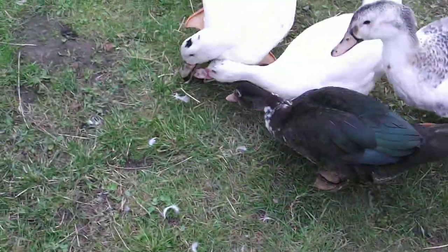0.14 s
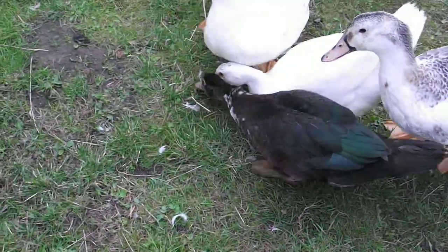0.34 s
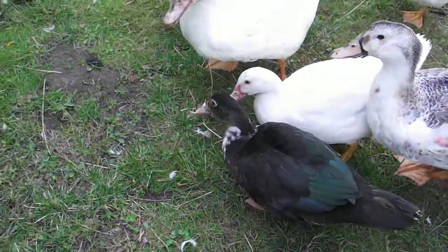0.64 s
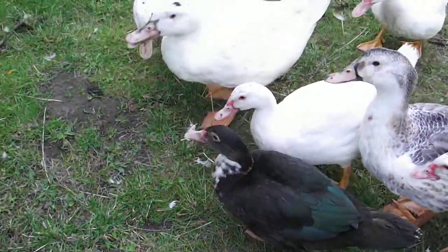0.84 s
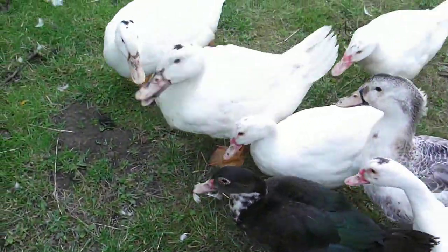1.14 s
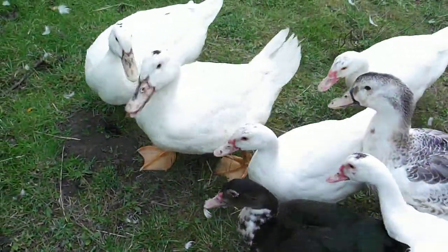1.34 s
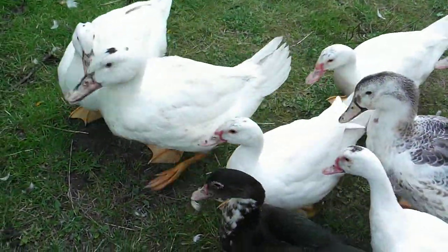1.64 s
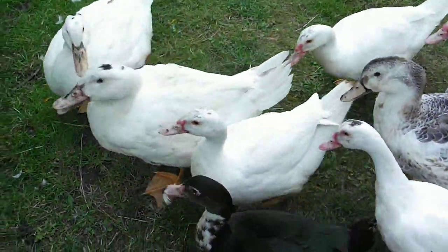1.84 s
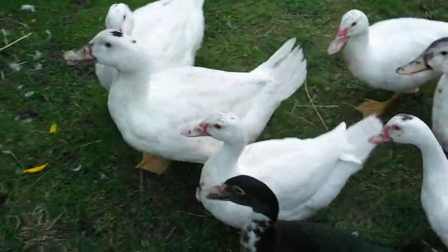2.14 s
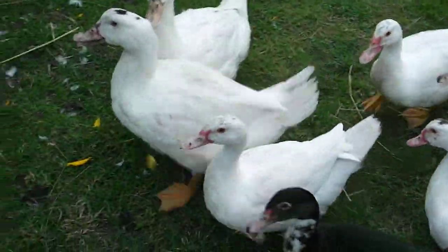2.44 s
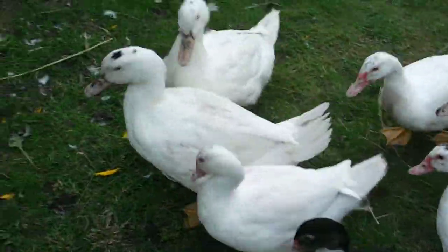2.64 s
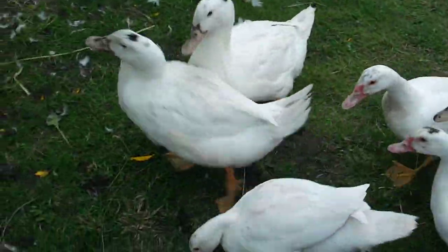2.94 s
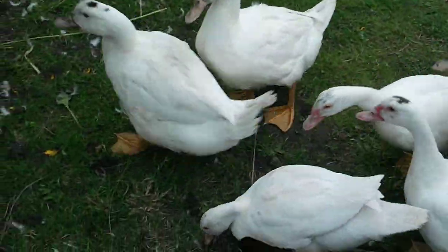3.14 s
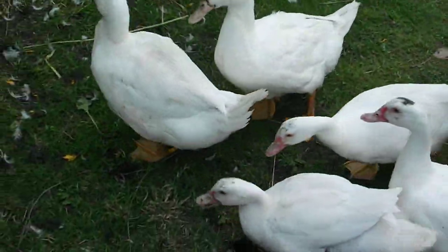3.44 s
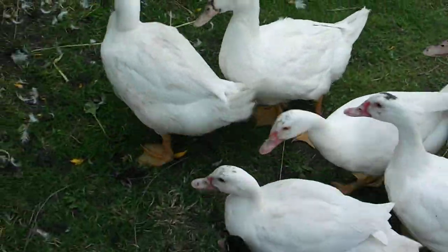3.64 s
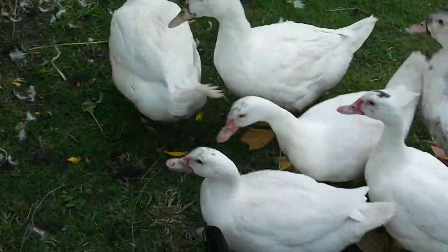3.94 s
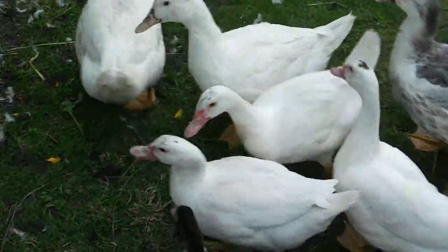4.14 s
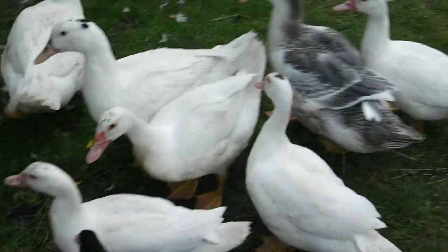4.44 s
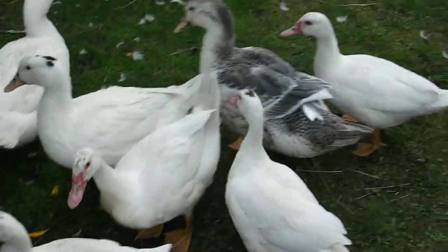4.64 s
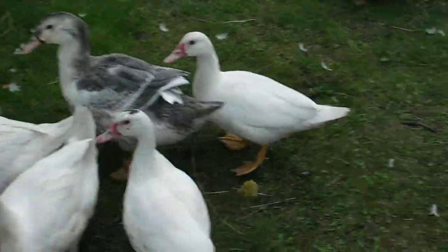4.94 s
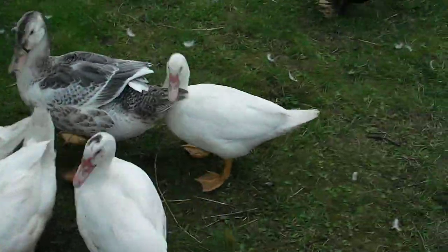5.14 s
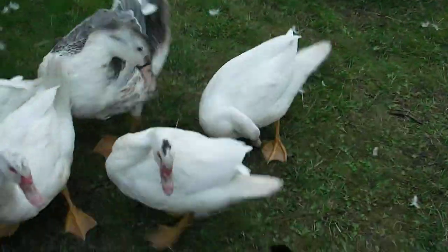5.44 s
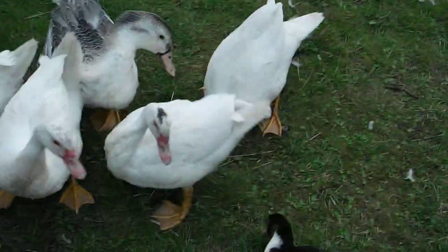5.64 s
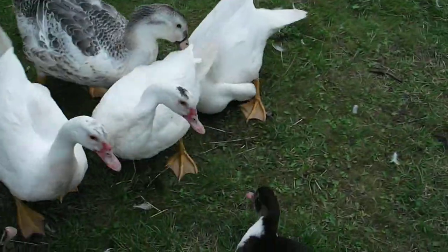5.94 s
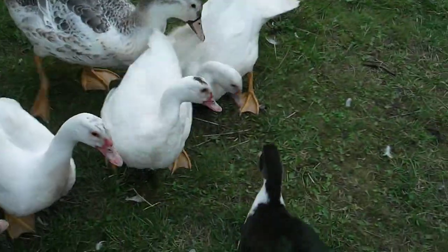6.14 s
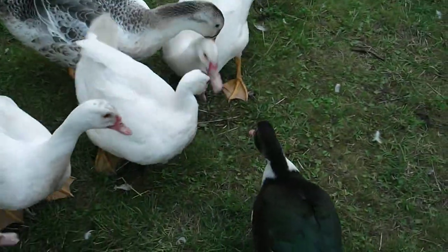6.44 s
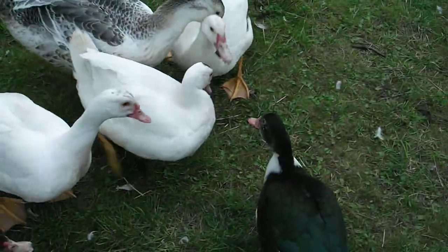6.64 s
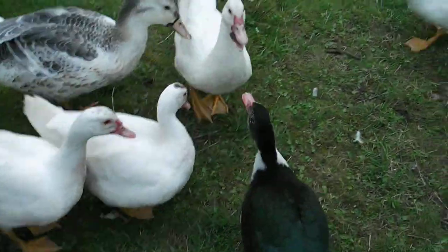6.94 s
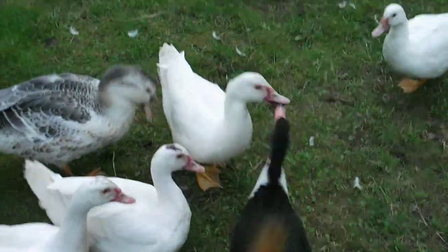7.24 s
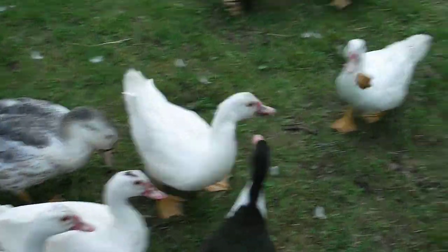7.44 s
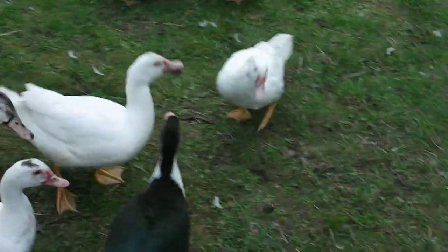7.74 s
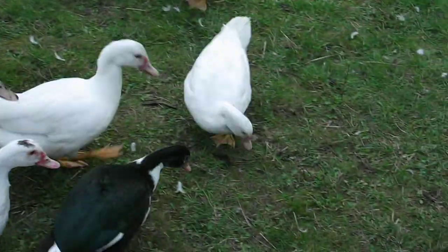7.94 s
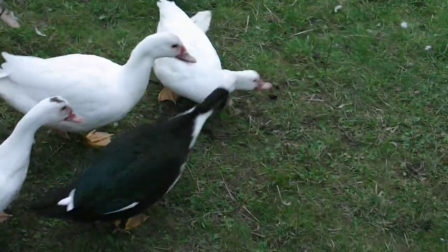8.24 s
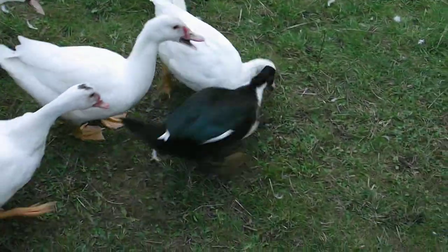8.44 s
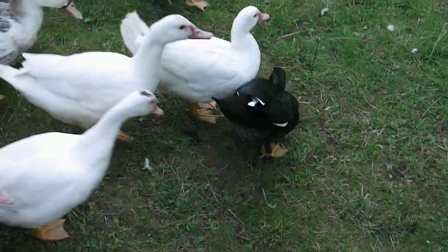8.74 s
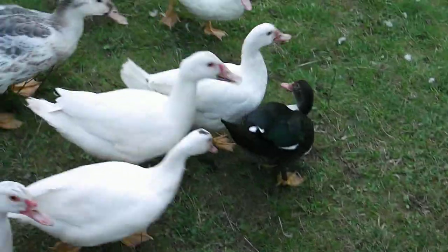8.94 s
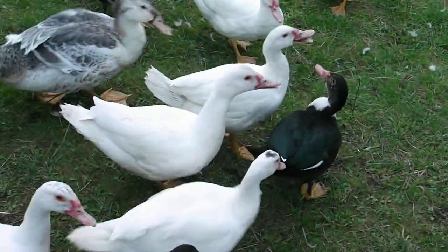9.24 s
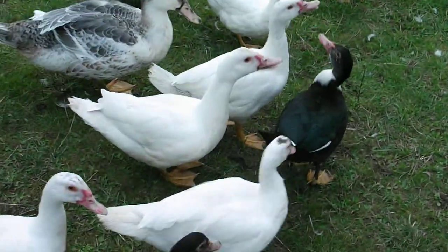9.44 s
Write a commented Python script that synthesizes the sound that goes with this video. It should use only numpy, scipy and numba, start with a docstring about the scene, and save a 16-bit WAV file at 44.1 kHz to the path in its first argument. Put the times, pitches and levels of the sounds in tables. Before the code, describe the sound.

Outdoors on grass, a close flock of ducks makes very short, soft popping clucks, cooing peeps and low raspy grunts in loose clusters, over constant faint chatter. Beaks tick drily and grass rustles lightly. Near two seconds one loud, hard snap cracks right at the microphone. A small bird cheeps and warbles, a cricket chirps regularly, and low traffic, wind and a sinking far engine drone lie beneath hiss and a thin electronic whine.

```python
"""Ducks feeding on a lawn

Ducks close by give grunts (pulse-excited resonators) and throbbing peeps (gliding tones with a pop), their beaks tick
(filtered noise bursts) and grass rustles (random grains); something snaps once at the microphone (decaying modes).
A small bird cheeps and warbles (gliding sines), insects sing (wing resonances), a far engine drones (two
harmonics) and circuits whine (a chopped sine) over far traffic, wind and hiss (shaped noise)."""
import sys
import numpy as np
from scipy import signal
from scipy.fft import rfft, irfft
from scipy.io import wavfile
from scipy.ndimage import uniform_filter1d
from numba import njit

SR = 44100
rng = np.random.default_rng(int(sys.argv[2]) if len(sys.argv) > 2 else 0)


def bounce(signal):
    """Save signal as a 16-bit WAV file at the path given by the first command-line argument."""
    frames = np.transpose(np.atleast_2d(signal))
    limited = np.clip(frames, -1, 1)
    pcm = np.round(limited * 32767).astype(np.int16)
    wavfile.write(sys.argv[1], SR, pcm)


N = 422478


def undb(db):
    """Decibels to amplitude ratio: 20 dB per factor of ten."""
    return 10 ** (np.asarray(db) / 20)


def level(x, db):
    """Root-mean-square scaling to a level in dB."""
    return x * undb(db) / np.sqrt(np.mean(x ** 2) + 1e-18)


def ring(x, hz, width):
    """Second-order resonance of unit gain at its centre; width is the bandwidth in Hz."""
    return signal.lfilter(*signal.iirpeak(min(hz, .45 * SR), hz / width, SR), x)


def body(x, modes):
    """Modal superposition: parallel resonances, neighbours in opposite phase."""
    return sum((-1) ** k * undb(db) * ring(x, hz, w) for k, (hz, w, db) in enumerate(modes))


def add(out, s, x):
    """Linear superposition of x onto out from time s."""
    i = int(s * SR)
    out[i:i + len(x)] += x[:len(out) - i]


def curve(table):
    """Linear interpolation of breakpoint columns to one value a sample."""
    s, *columns = np.transpose(table)
    return [np.interp(np.arange(N) / SR, s, c) for c in columns]


def walk(rate):
    """Low-pass random wander: held random steps at rate per second, smoothed twice, spread near 1."""
    k = int(SR / rate)
    steps = np.repeat(rng.standard_normal(N // k + 1), k)
    return 1.8 * uniform_filter1d(uniform_filter1d(steps, k), k)[:N]


def glide(dur, hz):
    """Phase as the integral of frequency, through start, middle and end pitch; returns time and phase."""
    t = np.arange(int(dur * SR)) / SR
    return t, 2 * np.pi * np.cumsum(np.interp(t / dur, [.1, .5, .9], hz)) / SR


def air():
    """Spectrally shaped noise of far traffic, wind and microphone hiss; its bands wander and the traffic recedes."""
    # spectrum shape before overall scaling: freq_hz, relative_db
    spectrum = [(25, -4), (40, -8), (100, -11.5), (250, -18.5), (400, -19.5), (700, -18), (1050, -20),
                (1400, -29), (2100, -37.5), (8500, -37), (11200, -26.5), (14000, -39)]
    air_db, traffic_fade_db = -45, -3  # overall rms level; change of the low bands from start to end
    f = np.fft.rfftfreq(N, 1 / SR)[1:]
    hz, db = np.transpose(spectrum)
    noise = rfft(rng.standard_normal(N))[1:] * undb(np.interp(np.log(f), np.log(hz), db))
    out, fade_db = 0, np.linspace(0, traffic_fade_db, N)
    # overlapping bands, centred half an octave apart from 2^4 Hz
    for centre in np.arange(4, 14.5, .5):
        band = np.clip(1 - np.abs(np.log2(f) - centre) / .5, 0, 1)
        wander_db = (1.5 if centre < 12 else .4) * walk(8)
        out = out + irfft(np.append(0, noise * band), N) * undb(wander_db + (centre < 11) * fade_db)
    return level(out, air_db)


def drone():
    """Harmonic series of a far engine: fundamental and octave, sinking in pitch and wavering in the air."""
    # mean course of the fundamental's level: time_s, level_db
    loudness = [(0, -52), (.8, -52), (1.25, -42), (1.6, -50.5), (2.8, -45), (4.4, -52), (4.8, -47),
                (6.4, -50), (9.58, -59.5)]
    # mean pitch at the two ends: start_hz, end_hz
    ends_hz = (74.8, 58.9)
    db, = curve(loudness)
    hz = np.linspace(*ends_hz, N) * (1 + 0.02 * walk(6.2))
    phase = 2 * np.pi * np.cumsum(hz) / SR
    tone = np.sin(phase) + undb(-18.5) * np.sin(2 * phase)
    return np.sqrt(2) * undb(db + 2.1 * walk(9)) * tone


def grass():
    """Granular impact noise: bunched crackles of blades under webbed feet ring resonances, with sparse stem snaps."""
    # feet in the grass, 3 dB above the resulting rustle: time_s, level_db
    stir = [(0, -54), (4.9, -61), (5.25, -54.5), (5.33, -50.5), (5.58, -54), (5.7, -58.5), (7.87, -56.5),
            (9.58, -62)]
    db, = curve(stir)
    hits = (rng.random(N) < 2500 / SR) * rng.standard_normal(N)
    grains = hits * undb(1.5 * rng.exponential(size=N) + 2.5 * walk(60))
    rustle = body(grains, [(2876, 420, 1.0), (4626, 430, 1), (6340, 740, -4.0)])
    stems = signal.lfilter([1], [1, -.97], rng.random(N) < 12 / SR) * rng.standard_normal(N)
    return undb(db) * level(rustle, -3.0) + level(ring(stems, 12300, 12000), -65)


def trillers():
    """Amplitude gating of a narrow-band resonance: regular wing strokes of a steady insect."""
    # one insect: wing_hz, width_hz, strokes_per_s, first_stroke_s, share_of_cycle, level_db
    hz, width, rate, first, share, db = (7722, 242, 29.02, 0.0214, 0.55, -66)
    cycle = ((np.arange(N) / SR - first) * rate) % 1
    stroke = np.sin(np.pi * np.clip(cycle / share, 0, 1)) ** .5
    tone = ring(ring(rng.standard_normal(N), hz, width), hz, width)
    return level(tone * stroke * undb(0.66 * walk(1.85)), db)


def whine():
    """Square-wave modulation of a steady circuit tone, flipping its sign and size."""
    tone_hz, chop_hz, chop_start_s = 9560.2, 36.22, .0055
    level_db, offset = -62.5, 0.52  # the offset makes the two half cycles unequal
    t = np.arange(N) / SR
    chop = np.sign(np.sin(2 * np.pi * chop_hz * (t - chop_start_s)))
    return level((offset + chop) * np.sin(2 * np.pi * tone_hz * t), level_db)


def peep(dur, hz, pop_db, db, rough, throb_hz, wobble, hoarse):
    """Frequency and amplitude modulation: the throat pops open, throbs, then settles into a swelling glide."""
    thump_hz, thump_db, thump_s = 198, -10, 0.01  # the chest under a pop; level against the pop
    t, phase = glide(dur, hz)
    phase = np.cumsum(np.gradient(phase) * (1 + rough * wobble[:len(t)]))
    pop = undb(pop_db) * np.exp(-t / 0.0029) * np.clip(t / 0.00062, 0, 1)
    throb = 1 - 0.95 * rough * np.exp(-t / 0.055) * np.cos(np.pi * throb_hz * t) ** 2
    arch = np.sin(np.pi * (t / dur) ** 0.84) ** 1.33
    swell = undb(db) * arch * throb * (1 + rough * hoarse[:len(t)])
    thump = undb(pop_db + thump_db) * np.exp(-t / thump_s) * np.sin(2 * np.pi * thump_hz * t)
    return (pop + swell) * np.sin(phase) + thump * (1 - t / dur)


def peeps():
    """Voiced frequency glides: the near birds' clucks and coos, and random chatter from the rest of the flock."""
    # clucks, a pop and a glide: start_s, length_s, start_hz, end_hz, pop_db, body_db
    clucks = [(0.048, 0.023, 675, 1106, -23.5, -32.5), (1.006, 0.0305, 660, 846, -25, -29.5),
              (1.108, 0.0454, 722, 1200, -26.5, -33.5), (1.216, 0.032, 670, 1027, -31, -30),
              (1.43, 0.0076, 610, 637, -21, -35), (1.653, 0.0094, 590, 510, -20.5, -26.5),
              (2.458, 0.05, 600, 1073, -28.5, -33), (2.571, 0.04, 537, 1054, -25, -26),
              (4.316, 0.045, 556.3, 850, -32, -37.5), (4.421, 0.044, 607, 997, -23.5, -33.5),
              (4.532, 0.029, 566, 930, -28.5, -34), (4.759, 0.022, 610, 900, -31, -44),
              (5.168, 0.019, 526, 454, -38, -35), (5.695, 0.038, 543, 845, -26.5, -25),
              (5.81, 0.033, 515, 1125, -29, -35), (5.932, 0.022, 550, 1020, -25.5, -37),
              (6.811, 0.0076, 980, 940, -32.5, -39), (7.171, 0.0267, 960, 1350, -45, -43),
              (7.22, 0.0189, 935, 1300, -40, -38.5), (7.67, 0.02, 534, 830, -23, -32),
              (7.778, 0.042, 520, 1190, -25.5, -33), (7.89, 0.026, 500, 900, -28.5, -30.5),
              (7.688, 0.026, 803, 1105, -40, -28.5), (7.964, 0.019, 830, 1150, -46, -41)]
    # coos, soft arched notes: start_s, length_s, top_hz, level_db
    coos = [(0.753, 0.034, 1090, -21.5), (1.464, 0.02, 785, -30), (1.656, 0.051, 1192, -32),
            (1.693, 0.032, 1036, -21.5), (2.69, 0.018, 850, -36.5), (2.74, 0.032, 1038, -32),
            (6.186, 0.044, 1042, -37.5), (6.229, 0.03, 1097, -34.5), (6.692, 0.021, 1072, -32.5),
            (7.26, 0.014, 1120, -34), (7.674, 0.015, 1070, -29), (7.865, 0.033, 993, -31.5),
            (7.901, 0.03, 1132, -29.5), (7.932, 0.027, 1143, -35), (8.088, 0.01, 952, -37.5),
            (4.464, 0.014, 1040, -39), (9.429, 0.043, 1280, -47)]
    cluck_bow = 1.03  # middle pitch over the straight glide
    coo_start, coo_end, coo_onset_db = 0.91, 0.89, -4  # pitches over the top; onset against the body
    wobble, hoarse, coo_rough = 0.03, 0.25, 0.5  # pitch and level unsteadiness; share of roughness in coos
    out = np.zeros(N)
    unsteady = np.tile([wobble * walk(300), hoarse * walk(500)], 2)
    notes = [(s, dur, [start, cluck_bow * (start + end) / 2, end], pop_db, db, 1)
             for s, dur, start, end, pop_db, db in clucks]
    notes += [(s, dur, [coo_start * hz, hz, coo_end * hz], db + coo_onset_db, db, coo_rough)
              for s, dur, hz, db in coos]
    for (s, *note), chance in zip(notes, rng.random(len(notes))):
        throb_hz = 130 + 60 * chance
        add(out, s, peep(*note, throb_hz, *unsteady[:, int(s * SR):]))
    # the rest of the flock, scattered evenly in time
    for when, pitch, rise, long, size in rng.random((220, 5)):
        hz, db = 520 + 550 * pitch, -52 - 2.0 * np.log(size)
        path = [hz, hz * (1 + 0.13 * rise), hz * (1 + 0.087 * rise)]
        note = peep(0.0064 + 0.019 * long, path, db, db, 0.89, 156, *unsteady[:, int(when * N):])
        add(out, when * N / SR, note)
    return out


def cricket():
    """Stridulation: wing teeth click unevenly into the wing resonances, one short burst a chirp."""
    # chirps: start_s, level_db
    chirps = [(.275, -55.5), (.935, -58), (1.605, -57), (2.25, -59), (2.935, -57.5), (3.555, -63.5),
              (4.24, -61.5), (5.155, -60), (6.04, -55), (6.692, -53), (7.395, -51.5), (8.022, -52),
              (8.752, -53.5), (9.395, -54.5)]
    # wing resonances, before any speed-up: freq_hz, width_hz, relative_db
    wing = [(6080, 107, 8.5), (6480, 206, 3.5), (7130, 440, -2.5)]
    # one higher, shorter chirp from another insect: start_s, level_db, speed_up (of wing and stroke)
    high_chirp = (4.78, -60, 1.17)
    stroke_s, tooth_rate_hz = 0.16, 370  # before any speed-up
    out, t = np.zeros(N), np.arange(int((stroke_s + 0.054) * SR)) / SR
    for s, db, speed in [(*row, 1) for row in chirps] + [high_chirp]:
        chance = rng.standard_normal((80, 2))
        at = np.cumsum(1 + 0.061 * chance[:, 0]) / tooth_rate_hz
        use = at < stroke_s
        teeth = 0.21 * rng.standard_normal(len(t)) * (t < stroke_s)
        teeth[(at[use] * SR).astype(int)] += undb(3.6 * chance[use, 1])
        swell = np.clip(t / .035, 0, 1) * np.clip((stroke_s - t) / .03, 0, 1)
        chirp = level(ring(body(teeth * swell, wing), 6760, 1500), db)
        add(out, s, signal.resample(chirp, int(len(t) / speed)))
    return out


def songbird():
    """Frequency-modulated tones: two-voiced cheeps, falling chips and warbles, all slightly hoarse."""
    # two-voiced rising cheeps: start_s, low_voice_db, high_voice_db
    cheeps = [(0.3, -55, -52), (2.006, -52, -64), (3.043, -53.5, -52), (5.02, -48, -52.5)]
    # falling chips: start_s, level_db
    chips = [(4.382, -49), (4.448, -46), (4.538, -48)]
    # pitch curves of two warbles: time_s, pitch_hz
    warbles = [
        [(5.345, 1320), (5.364, 2480), (5.38, 2240), (5.396, 2330), (5.41, 2800), (5.42, 2400)],
        [(7.762, 2338), (7.795, 3100), (7.812, 2350), (7.832, 2286), (7.844, 2900), (7.854, 2359),
         (7.869, 2200), (7.887, 3010), (7.916, 2150), (7.932, 3100), (7.962, 2360), (7.975, 3070), (7.99, 2160),
         (8.012, 2480), (8.02, 2830), (8.035, 2140)],
    ]
    # pitches at start, middle and end, low voice then high voice
    cheep_s, cheep_hz = 0.049, [(2840, 3250, 4300), (4250, 4550, 4850)]
    chip_s, chip_hz = 0.0114, (5420, 4670, 4600)
    # levels at start, middle, end of each warble; dB lost per kHz above 2.4 kHz
    warble_db, high_loss_db = [(-49, -46, -45), (-49.5, -55.5, -49.5)], 9.5
    out = np.zeros(N)
    notes = [(s, cheep_s, hz, db) for s, *dbs in cheeps for hz, db in zip(cheep_hz, dbs)]
    notes += [(s, chip_s, chip_hz, db) for s, db in chips]
    for s, dur, hz, db in notes:
        t, phase = glide(dur, hz)
        add(out, s, undb(db) * np.sin(np.pi * t / dur) ** 0.6 * np.sin(phase))
    for table, dbs in zip(warbles, warble_db):
        s, hz = np.transpose(table)
        dur = s[-1] - s[0]
        t = np.arange(int(dur * SR)) / SR
        pitch = uniform_filter1d(np.interp(t + s[0], s, hz), size=100) + 25 * walk(198.0)[:len(t)]
        loud = np.interp(t / dur, [.1, .5, .9], dbs) + walk(93.0)[:len(t)]
        loud = loud - high_loss_db * np.maximum(pitch / 1000 - 2.4, 0)
        edges = np.clip(np.minimum(t, dur - t) / 0.0057, 0, 1)
        add(out, s[0], undb(loud) * edges * np.sin(2 * np.pi * np.cumsum(pitch) / SR))
    out = out * (1 + 0.28 * walk(300))  # hoarseness
    return out + undb(-12) * np.roll(out, int(0.011 * SR))  # a near wall answers


def ticks():
    """Impulsive excitation: dry beak and twig clicks as resonated noise bursts with a scratchy tail."""
    # clicks: start_s, peak_db, centre_hz
    clicks = [(0.5465, -39, 1580), (1.32, -33, 2900), (1.7023, -25.5, 3400), (2.177, -38, 7750),
              (2.486, -34, 11000), (2.582, -32, 2230), (2.108, -40, 3500), (5.1695, -29.5, 1460),
              (6.7367, -37, 6060), (7.09, -35, 5000), (7.5592, -34, 1490), (7.676, -31.5, 2920),
              (7.71, -26.5, 4870), (7.8177, -33, 9570), (8.55, -34, 9000), (9.185, -39, 4500)]
    out, t = np.zeros(N), np.arange(2000) / SR
    for s, db, hz in clicks:
        burst = rng.standard_normal(len(t)) * (np.exp(-t / 0.0026) + 0.11 * np.exp(-t / 0.012))
        click = ring(burst, hz, 0.2 * hz) + 0.21 * ring(burst, min(0.83 * hz, 5200), 4000)
        add(out, s, click * undb(db) / np.abs(click).max())
    return out


def grunts():
    """Source-filter voice: slack, uneven throat pulses ring tract, beak and chest, each with a raspy puff of air."""
    # calls; beak and rasp against the tract: start_s, length_s, mean_pulse_rate_hz, level_db, beak_db, rasp_db
    calls = [(0.564, 0.04, 110.5, -35.5, -6, -16.5), (0.667, 0.027, 127.1, -34, -5, -16),
             (0.758, 0.029, 130, -35, -7, -16.5), (0.711, 0.011, 151.7, -43.5, -5, -24),
             (2.712, 0.03, 118.8, -43, -9, -15), (2.76, 0.037, 112.1, -34.5, -6.5, -20),
             (2.886, 0.021, 141.8, -37, -3, -18.5), (2.995, 0.019, 181, -40, -6, -20),
             (3.089, 0.028, 134.3, -33, -9.5, -16), (4.418, 0.023, 157.3, -45, -5.5, -22),
             (4.617, 0.018, 150.3, -44.5, -9, -16), (5.376, 0.058, 131.6, -42.5, -8.5, -27),
             (6.516, 0.024, 181.5, -43.5, -0.5, -27), (6.632, 0.018, 159.3, -40.5, -2.5, -22.5),
             (7.568, 0.022, 136.5, -46.5, -3.5, -28), (8.324, 0.044, 107.1, -37, -4, -20),
             (8.42, 0.033, 142.8, -37.5, -2.5, -19.5), (8.528, 0.032, 142.4, -37, 3.5, -14.5)]
    # closed tract resonances, mean tuning: freq_hz, width_hz, relative_db
    tract = [(431, 110, -1), (714, 123, -2)]
    # open beak resonances, mean tuning: freq_hz, width_hz, relative_db
    beak = [(887, 89, 4), (1040, 188, -1), (1514, 38, -10)]
    # rasp resonances, mean tuning: freq_hz, width_hz, relative_db
    rasp_modes = [(2550, 900, -1), (4150, 550, 1), (4800, 850, 1)]
    soft_start, chest_db = 0.25, -2  # where the first pulse stands on the half-sine swell; chest against tract
    out = np.zeros(N)
    for s, dur, hz, db, beak_db, rasp_db in calls:
        t = np.arange(int((dur + 0.043) * SR)) / SR
        # random columns: pulse timing, pulse strength, resonance tuning
        chance = rng.standard_normal((16, 3))
        noise = rng.standard_normal(3000)[np.arange(len(t)) % 3000]

        def detuned(modes):
            """Random tuning: each call's resonances are shifted a little."""
            return [(f * (1 + .04 * c), w, g) for (f, w, g), c in zip(modes, chance[:, 2])]

        at = np.cumsum((1 + .04 * chance[:, 0]) / hz)
        at = at - at[0] + .001
        use = at < dur - .004
        effort = np.sin(np.pi * np.clip(soft_start + 0.59 * at / dur, 0, 1))
        pulses = np.zeros(len(t))
        pulses[(at[use] * SR).astype(int)] = -(effort * undb(1.5 * chance[:, 1]))[use]
        puff = signal.lfilter([1], [1, -np.exp(-1 / (0.0018 * SR))], -pulses) * noise
        drive = pulses + 0.11 * puff
        throat = level(body(drive, detuned(tract)), 0)
        throat = throat + level(body(drive * np.exp(-t / 0.05), detuned(beak)), beak_db)
        chest = level(ring(pulses, 1.21 * hz, 77), chest_db)  # booms just above the pulse rate
        soft = signal.lfilter(*signal.butter(2, 1700, fs=SR), throat + chest)
        breath = np.clip(t / 0.0051, 0, 1) * (pulses + 0.24 * puff)
        rasp = sum(undb(g) * ring(ring(breath, f, w), f, w) for f, w, g in detuned(rasp_modes))
        add(out, s, undb(db) * (soft + level(rasp, rasp_db)))
    return out


def snap():
    """Modal decay: quick successive cracks ring one small hard object, each a tiny splintering burst."""
    # cracks; low_modes_db acts below 2 kHz: start_s, relative_db, low_modes_db, hiss_db
    cracks = [(1.952, -2, -10, -21), (1.9557, 0.5, 3, -12), (1.9585, -2.5, -3, -18.5),
              (1.968, -13, -4, -30)]
    # what they ring, t60_s being the time to fall 60 dB: mean_freq_hz, relative_db, t60_s
    modes = [(559, -8, 0.064), (1110, 6, 0.014), (1530, 4, 0.022), (2580, 3, 0.014), (3490, 8.5, 0.0053),
             (4250, 18, 0.003), (4650, 18, 0.005), (5280, 12, 0.0036), (6120, 6, 0.0051)]
    out, t = np.zeros(N), np.arange(4000) / SR
    for s, db, low_db, hiss_db in cracks:
        crack = rng.standard_normal(len(t)) * np.exp(-t / 0.0012)
        push = np.append(1, .08 * crack[1:300])
        detune = 1 + .012 * rng.standard_normal(len(modes))  # each crack's modes are randomly detuned a little
        rings = sum(undb(g + low_db * (hz < 2000)) * np.sin(2 * np.pi * hz * d * t) * 1000 ** (-t / t60)
                    for (hz, g, t60), d in zip(modes, detune))
        struck = np.convolve(rings * np.clip(t / 0.0012, 0, 1), push)[:len(t)]
        add(out, s, undb(db) * (0.46 * struck + undb(hiss_db) * crack))
    return out


def scene():
    """Superposition and scattering: bodies, ground and fences smear the birds with a short tail."""
    birds = grunts() + peeps() + ticks() + songbird()
    tail = rng.standard_normal(3000) * np.exp(-np.arange(3000) / (0.011 * SR))
    birds = birds + undb(-32.5) * signal.fftconvolve(birds, tail)[:N]
    return (birds + snap() + cricket() + trillers() + drone() + grass() + air() + whine())[None]


@njit
def follow(x, release):
    """Peak detection: instant rise, exponential fall by the factor release a sample."""
    e, y = 0., np.empty(len(x))
    for i in range(len(x)):
        e = max(abs(x[i]), e * release)
        y[i] = e
    return y


def record(dry):
    """Dynamic compression: the gain ducks just after a loud peak and lets go; the converter clips; the top is cut."""
    threshold_db, delay_s, top_hz = -14, 0.0068, 15700
    peak = follow(dry[0], np.exp(-1 / (.07 * SR)))  # 70 ms release
    gain = np.minimum(1, (undb(threshold_db) / (peak + 1e-9)) ** 0.46)
    gain = np.roll(uniform_filter1d(gain, size=200), int(delay_s * SR))
    wet = np.clip(dry * gain, -.9, .9)
    steep = signal.ellip(10, .2, 90, top_hz, fs=SR, output="sos")
    return signal.sosfilt(steep, wet)


dry = scene()
out = record(dry)
bounce(out)
```